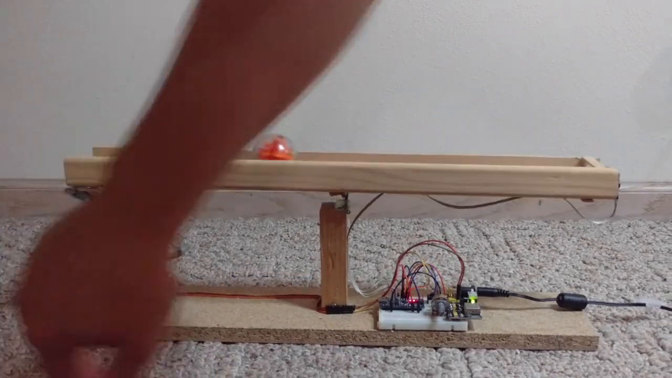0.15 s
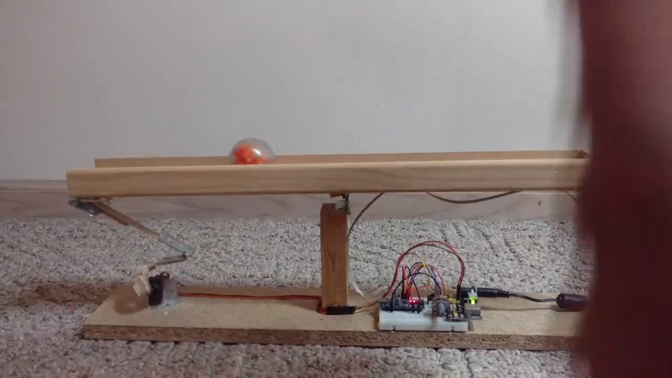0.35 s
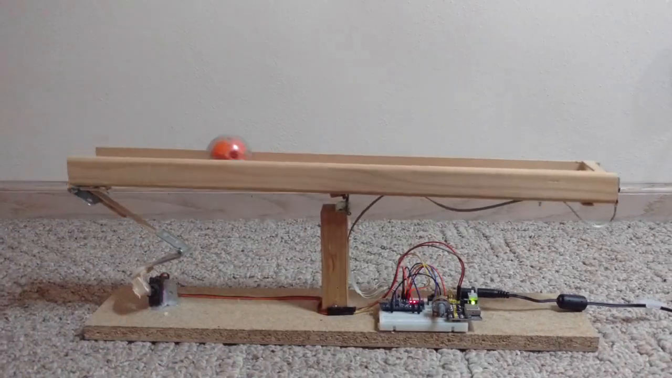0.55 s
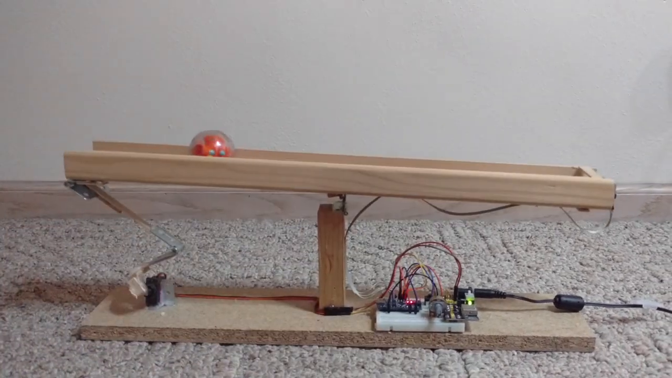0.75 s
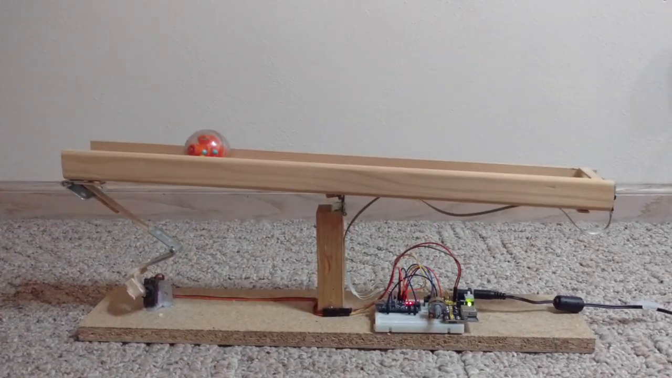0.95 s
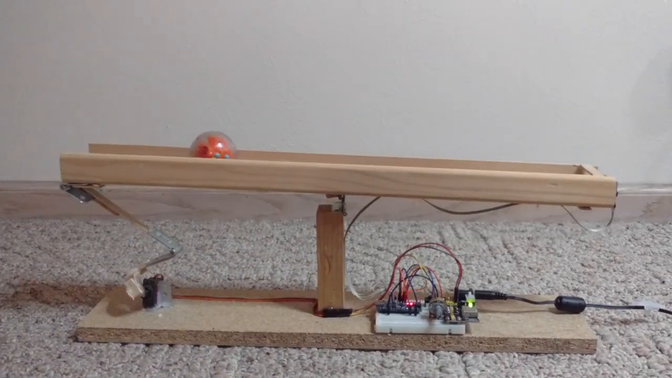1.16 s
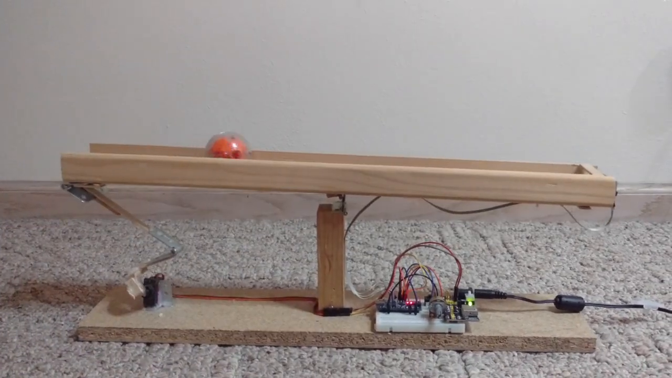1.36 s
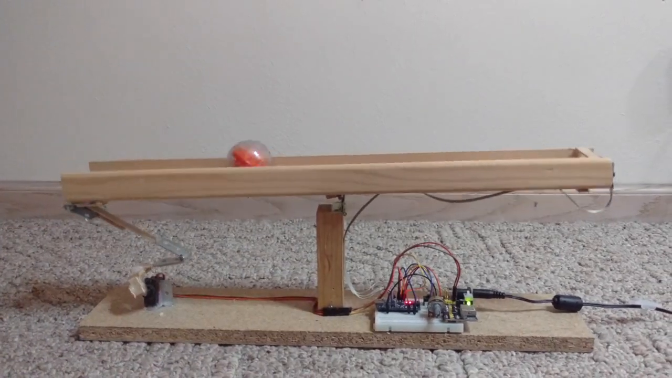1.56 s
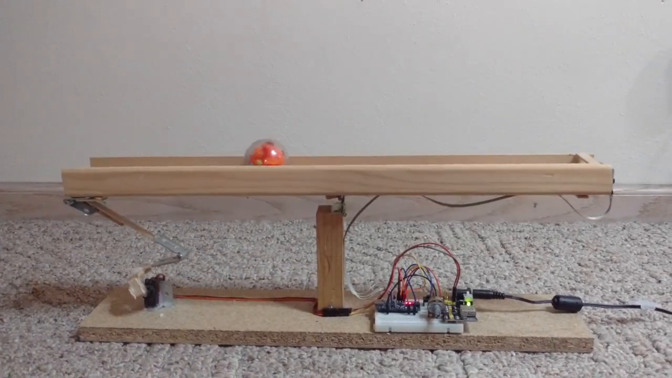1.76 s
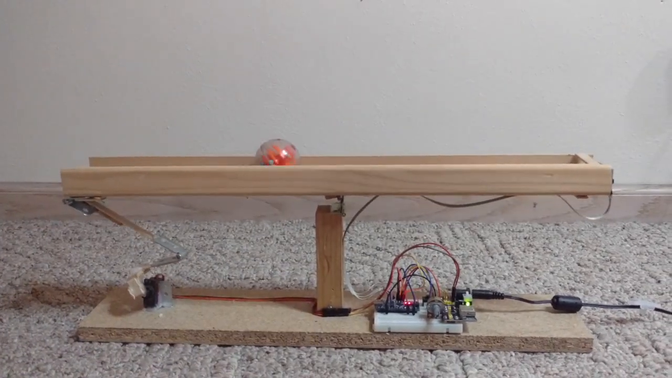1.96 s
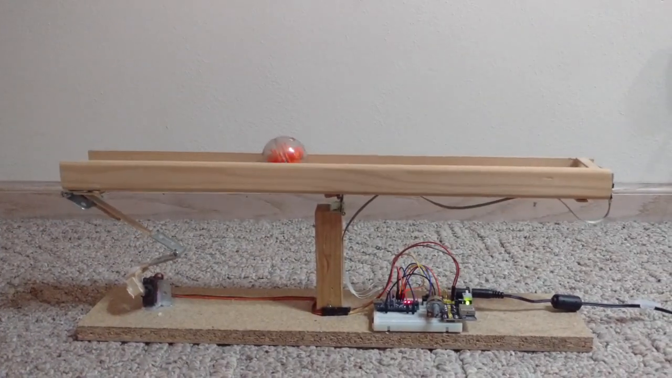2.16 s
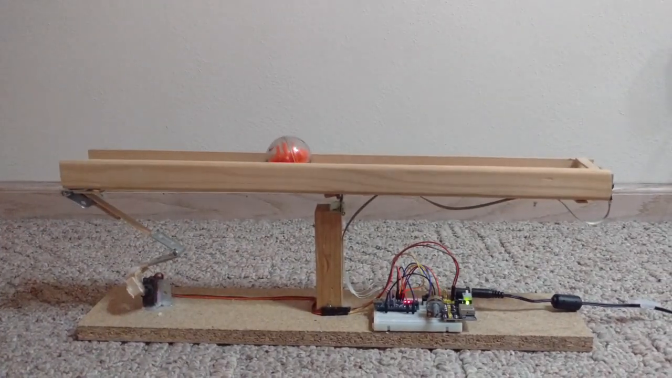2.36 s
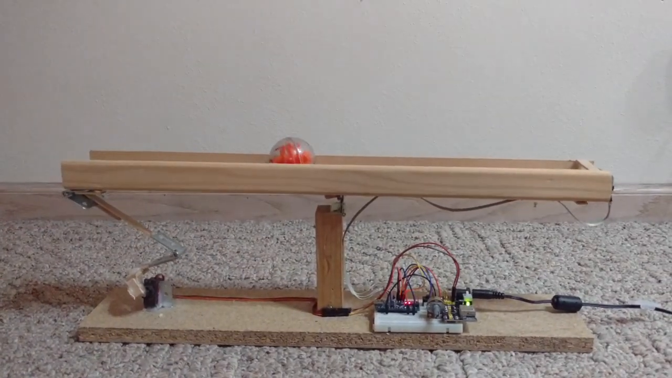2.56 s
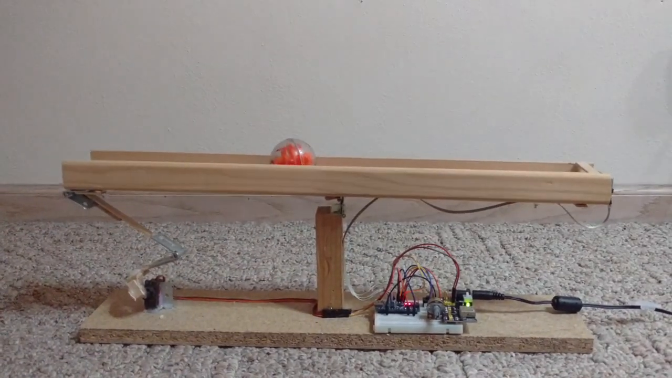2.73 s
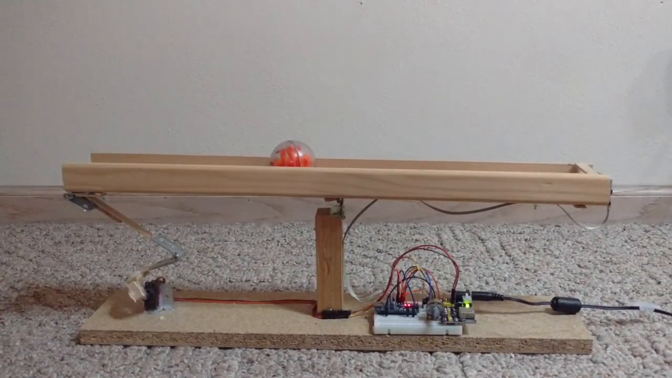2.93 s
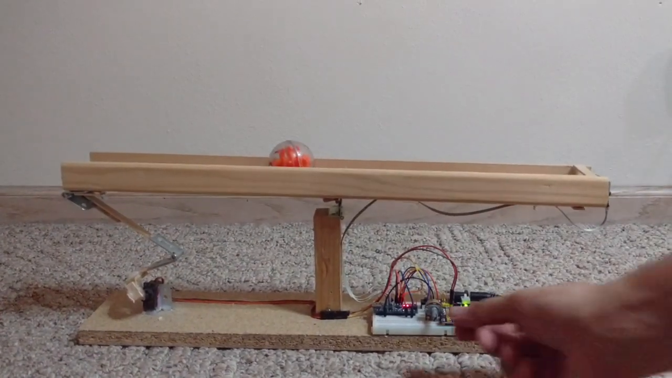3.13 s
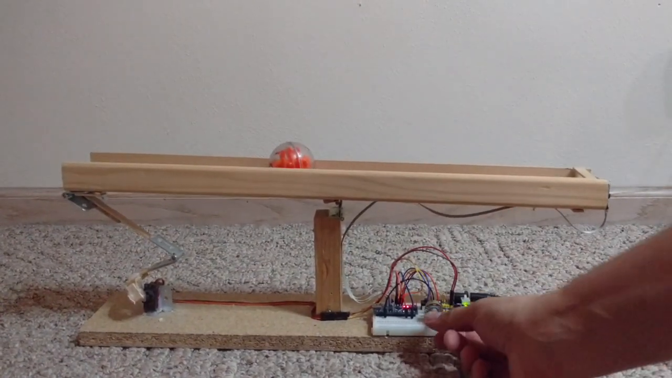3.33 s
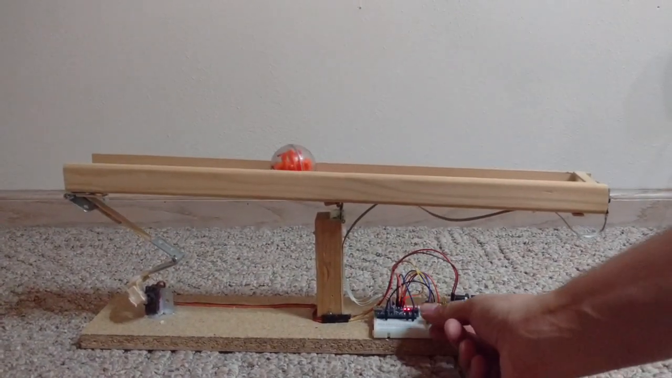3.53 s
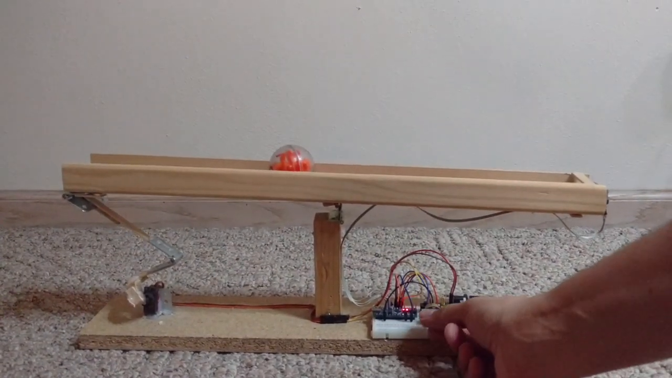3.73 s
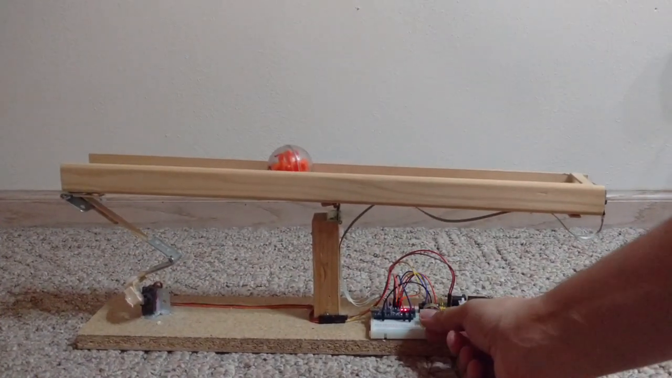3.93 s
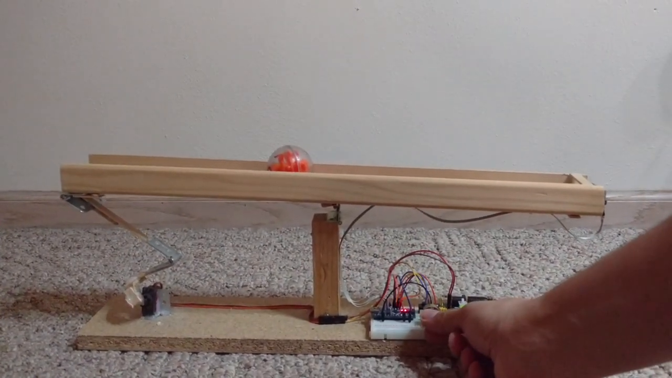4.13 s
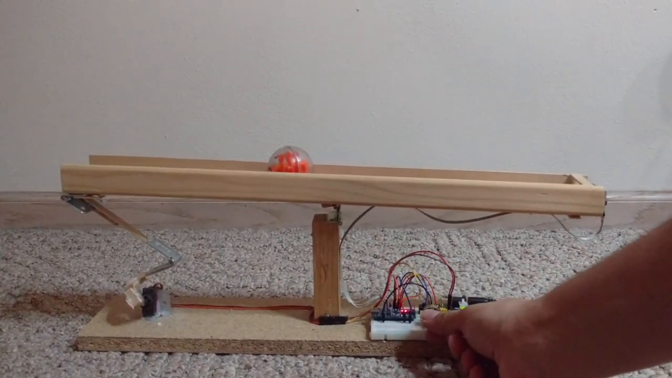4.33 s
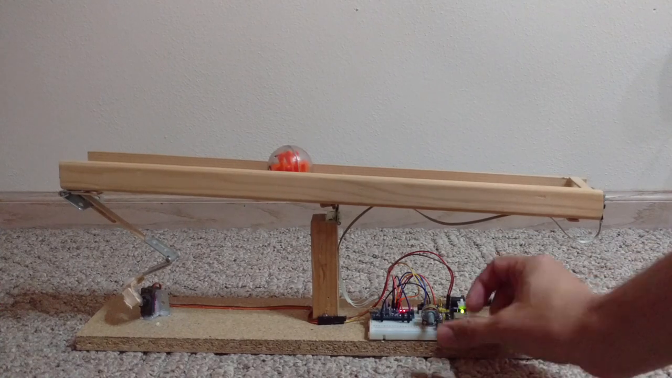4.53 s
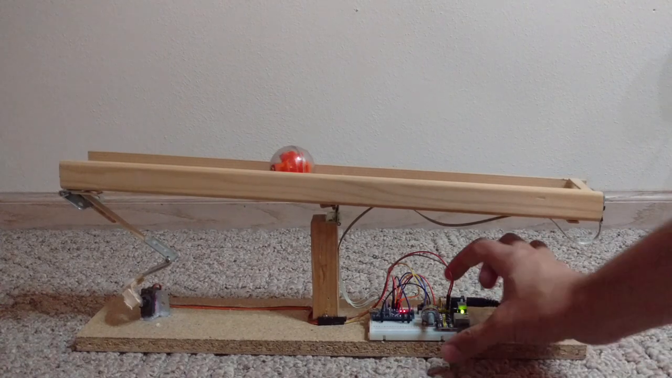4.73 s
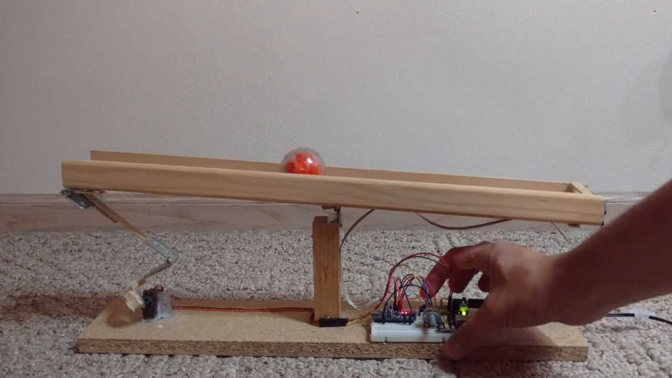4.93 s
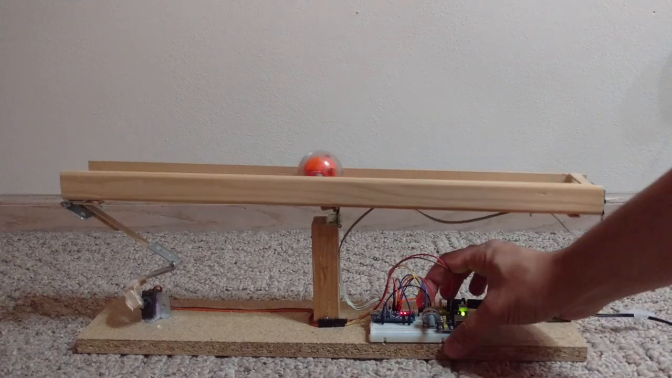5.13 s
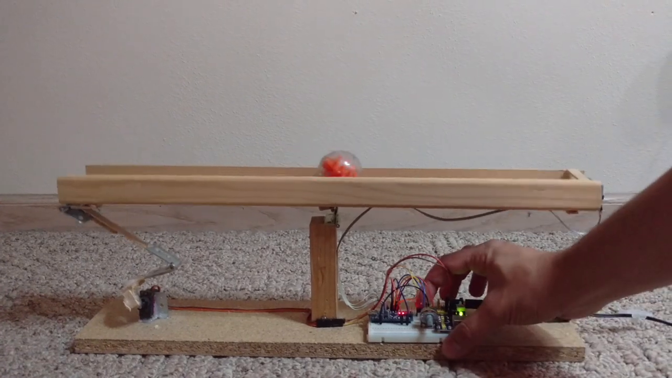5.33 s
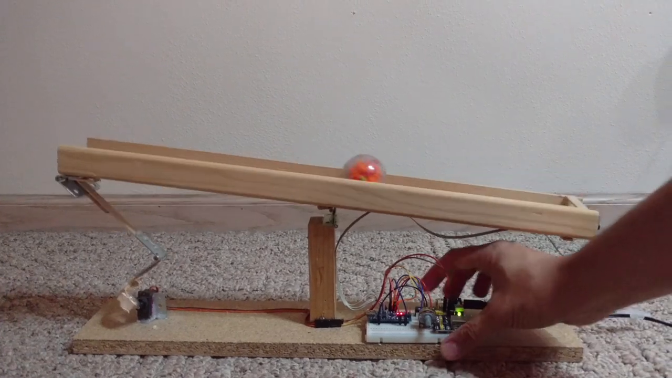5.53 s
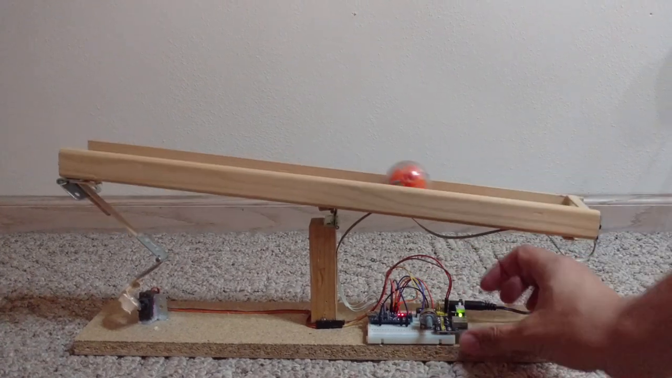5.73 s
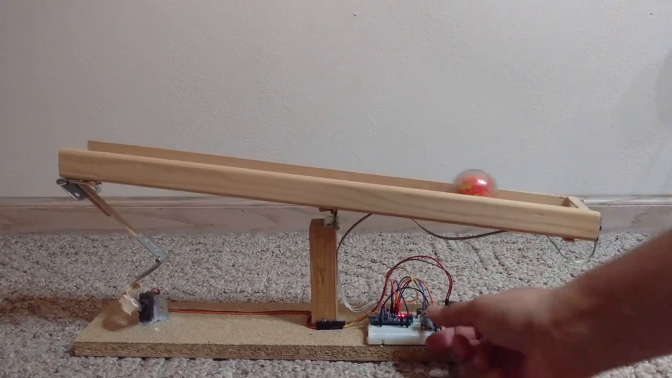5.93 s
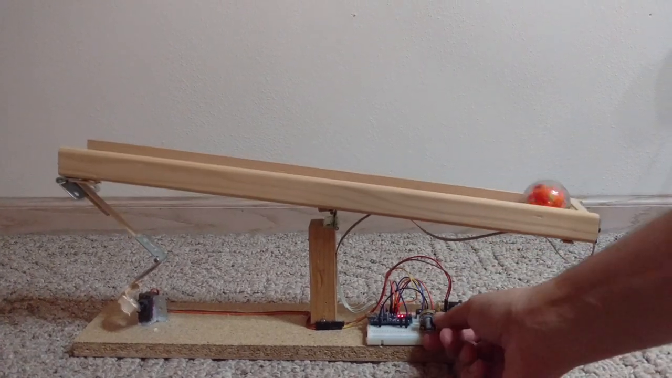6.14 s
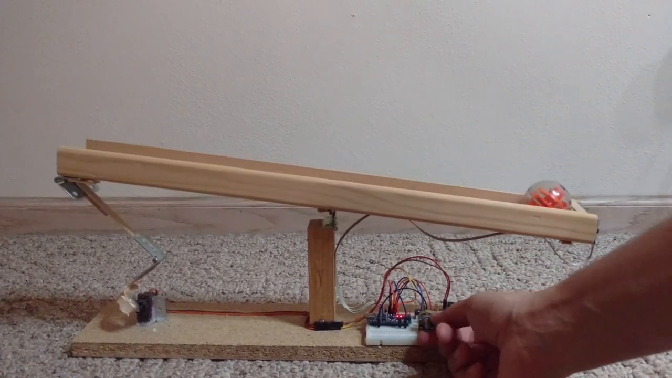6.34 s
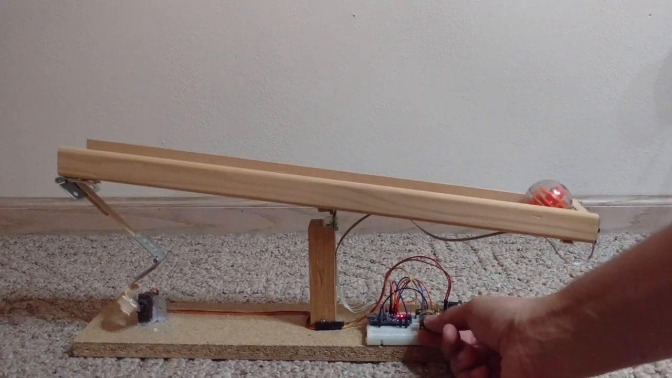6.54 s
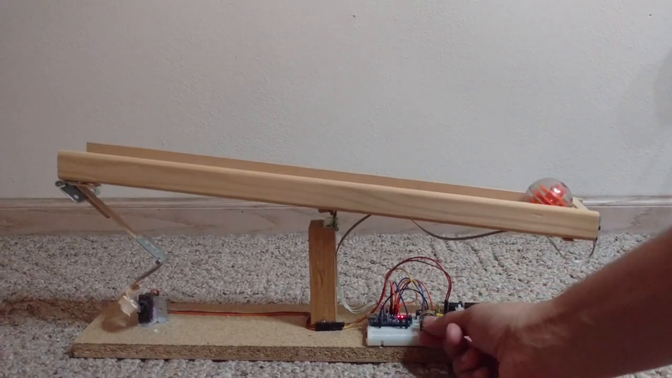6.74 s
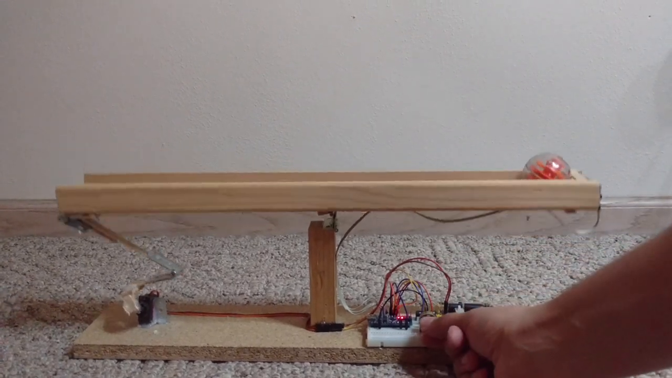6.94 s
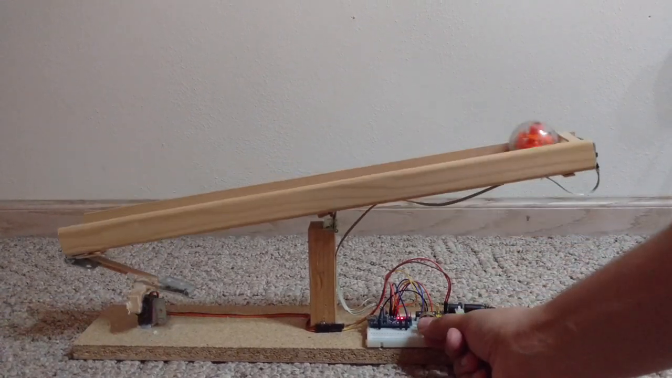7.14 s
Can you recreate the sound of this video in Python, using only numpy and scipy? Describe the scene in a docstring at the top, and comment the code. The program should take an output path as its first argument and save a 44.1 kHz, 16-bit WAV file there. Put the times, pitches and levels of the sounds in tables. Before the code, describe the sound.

A small servo whirs and ticks rapidly as a hollow plastic ball crackles along a tilting wooden beam, finally knocking hard against its end.

```python
"""A hobby servo tilts a wooden beam on which a hollow plastic ball rolls, in a quiet carpeted room.
Throughout, the room hushes and hums and an arm rustles on the carpet: coloured noise and one low tone.
From the start the servo whirs in bursts of gear chatter, ticks fifty times a second until 6 s, and the
ball crackles and rumbles (noise shaped by many tiny contacts). Soon knocks ring the beam, then come soft
bumps, thuds, a far clock, light taps and pings of the wire link. Near 6.2 s the ball hits the end stop."""
import sys
import numpy as np
from scipy import signal
from scipy.fft import rfft, irfft, next_fast_len
from scipy.io import wavfile
from scipy.ndimage import map_coordinates

SR = 44100
rng = np.random.default_rng(int(sys.argv[2]) if len(sys.argv) > 2 else 0)


def digitize_waveform(pressure):
    """Quantize a signal to 16-bit integers and store it at the path in sys.argv[1].

    Rows of a 2-D input are taken as channels; values are limited to [-1, 1].
    """
    field = np.atleast_2d(pressure).T
    bounded = np.clip(field, -1, 1)
    quanta = np.round(bounded * 32767).astype(np.int16)
    wavfile.write(sys.argv[1], SR, quanta)


N = 316638
TIME_S = np.arange(N) / SR
# Levels in the tables are relative: each function trims its layers. t60_s is the time to fade by 60 dB.


def amp(db):
    """Turn decibels into gain."""
    return 10 ** (np.asarray(db) / 20)


def unit(x):
    """Scale to rms 1."""
    return x / np.sqrt(np.mean(x ** 2) + 1e-20)


def along(points, hz):
    """Read a curve of (pitch, value) points on a log pitch axis."""
    point_hz, values = np.transpose(points)
    return np.interp(np.log(hz + 1), np.log(point_hz + 1), values)


def curves(rows):
    """Draw one value per sample for each column after the time."""
    knot_s, *columns = np.transpose(rows)
    return [np.interp(TIME_S, knot_s, column) for column in columns]


def wobble(rate):
    """Draw a smooth random curve with this many knots a second."""
    knots = rng.standard_normal(int(N * rate / SR) + 4)
    return map_coordinates(knots, [np.arange(N) * rate / SR])


def noise(spectrum, size=N):
    """Make coloured noise of rms 1, one row for each of two microphone ports."""
    m = next_fast_len(size)
    colour = amp(along(spectrum, np.fft.rfftfreq(m, 1 / SR)))
    white = rfft(rng.standard_normal((2, m)))
    return unit(irfft(white * colour, m)[:, :size])


def fade(t, t60):
    """Die away exponentially, by 60 dB in t60 seconds."""
    return np.exp(-np.log(1000) * t / t60)


def add(track, s, sound):
    """Mix a sound into a track at time s."""
    start = max(round(s * SR), 0)
    track[:, start:start + sound.shape[1]] += sound[:, :max(N - start, 0)]


def bursts(times, sizes, t60):
    """Loudness curve of rms 1 for many small impacts whose energies add up."""
    places = np.clip(times * SR, 0, N).astype(int)
    energy = np.bincount(places, sizes ** 2, N + 1)[:N]
    decay = fade(np.arange(SR // 10) / SR, t60) ** 2
    return unit(np.sqrt(np.abs(signal.fftconvolve(energy, decay)[:N])))


def contacts(rate, spread_db, t60):
    """Loudness curve of small contacts at uneven gaps and strengths."""
    gaps, strengths = rng.standard_normal((2, 8000))
    times = np.cumsum(np.exp(.5 * gaps)) / rate
    return bursts(times, amp(spread_db * np.clip(strengths, -2, 2)), t60)


def ring(modes, t, scatter_db):
    """Strike modes at new strengths; the two ports hear them a quarter cycle apart."""
    ports = np.array([[1], [-1]]) * np.pi / 4
    total = 0
    for hz, db, t60 in modes:
        strength = amp(db + scatter_db * rng.standard_normal())
        total = total + strength * fade(t, t60) * np.sin(2 * np.pi * hz * t + ports)
    return total


def strikes(events, spectrum, rise, t60):
    """Damped strikes without a clear pitch: noise that rises fast and dies away."""
    sound, t = np.zeros((2, N)), np.arange(SR // 2) / SR
    for s, db in events:
        add(sound, s, amp(db) * (1 - fade(t, rise)) * fade(t, t60) * noise(spectrum, size=len(t)))
    return sound


SPEED_LAW = 1.93  # loudness grows as this power of speed


def swell(peak_s, rise_s, fall_s):
    """Loudness, 0-1, of a swing that gathers speed and slows to a stop like a pendulum."""
    t = TIME_S - peak_s
    phase = np.clip(np.maximum(-t / rise_s, t / fall_s), 0, 1)
    return np.abs(np.cos(np.pi / 2 * phase)) ** SPEED_LAW


# the arm's shifts on the carpet: fastest_s, speeding_up_s, slowing_s, level_db
ARM_SHIFTS = [(.35, 1.1, 1.4, -57), (1.55, 0.46, 0.71, -59.5), (2.4, 0.35, 0.39, -54.5),
              (3.35, 1.1, 0.96, -62.5), (5.25, 1.7, 1.2, -64.5), (6.08, 0.28, 0.44, -60.5)]
# colour of the carpet rustle: pitch_hz, level_db
CARPET_COLOUR = [(30, -33.5), (90, -5.5), (170, -3.5), (300, -1), (500, -2.5), (900, -11.5), (2000, -9.5),
                 (6000, -15.5)]
ARM_REST_DB = -66  # its faint rustle in between, before the trim


def arm_on_carpet():
    """Cloth or skin rubs carpet fibres: uneven noise that grows with the speed of the arm."""
    rubbing = amp(ARM_REST_DB)
    for peak_s, rise_s, fall_s, db in ARM_SHIFTS:
        rubbing = rubbing + amp(db) * swell(peak_s, rise_s, fall_s)
    return rubbing * amp(1.0 + 2.3 * wobble(11)) * noise(CARPET_COLOUR)


# colour of the room's steady hush: pitch_hz, level_db
AIR_COLOUR = [(25, -9), (60, -6), (150, 16.5), (300, -18.5), (700, 18), (1400, 12), (2500, 14),
              (6000, 11.5), (11000, -6.5), (15000, -79)]
HUM_HZ, HUM_DB = 150, -78


def room_hush():
    """The steady room: coloured noise and one pure low hum."""
    hum = amp(HUM_DB) * np.sin(2 * np.pi * HUM_HZ * TIME_S)
    return hum + amp(-66.5) * noise(AIR_COLOUR)


# servo moves: start_s, end_s, level_db, spin_up_s, case_ringing_against_gears_db
SERVO_MOVES = [(0, 0.039, -58, 0.0014, -30), (0.213, 0.242, -54.5, 0.0019, -9),
               (0.46, 0.689, -61.5, .002, -25), (1.506, 1.548, -62, 0.0024, -7),
               (5.027, 5.05, -62.5, .002, -16), (5.158, 5.161, -47.5, 0.0022, -3),
               (5.167, 5.22, -62.5, .006, -15), (5.257, 5.537, -59, 0.29, -7.5),
               (5.417, 5.426, -53, 0.0045, -6), (5.475, 5.48, -58.5, .003, -5.5),
               (5.512, 5.518, -58.5, .003, -12), (6.69, 7.176, -68, 0.14, -4),
               (6.946, 7.022, -61.5, 0.052, -11), (7.055, 7.148, -71.5, 0.003, 4)]
# colour of the running gears: pitch_hz, level_db
GEAR_COLOUR = [(150, -51), (900, -14), (1400, 0.5), (2000, -5.5), (2600, -11.5), (3300, -4.5), (4200, 5),
               (4900, 6), (5900, -8.5), (6500, 8.5), (7300, -3.5), (8600, -9), (10000, -7.5), (15000, -27)]
# the case's resonances under running gears: pitch_hz, level_db
WHIRR_COLOUR = [(3700, -26.5), (4120, -13), (4600, -30), (5100, -23), (5420, -9), (5750, -6), (6230, -4.5),
                (6700, -7), (7700, -33), (8340, -11), (9200, -22)]
TOOTH_HZ, TOOTH_SCATTER_DB, TOOTH_T60_S = 520, 2, .013  # middle tooth rate; it drifts at random
SURGE_DB, SURGE_HZ = 1.8, 110  # size and random knots a second of the surges


def servo_run():
    """The gear train spins up, chatters tooth on tooth in uneven surges, rings the case and stops."""
    gears, case = np.zeros((2, N))
    for start, end, db, spin_up, case_db in SERVO_MOVES:
        spinning = np.clip((TIME_S - start) / spin_up, 0, 1)
        stopping = np.clip((end - TIME_S) / 0.0051 + 1, 0, 1)
        gears += amp(db) * spinning * stopping
        case += amp(db + case_db) * spinning * stopping
    turns = np.cumsum(TOOTH_HZ * amp(1.3 * wobble(25))) / SR
    teeth = np.flatnonzero(np.diff(np.floor(turns))) / SR
    strengths = np.clip(rng.standard_normal(len(teeth)), -2, 1)
    chatter = bursts(teeth, amp(TOOTH_SCATTER_DB * strengths), TOOTH_T60_S)
    surge_db = SURGE_DB * np.clip(wobble(SURGE_HZ), -2, 1)
    return amp(16.5 + surge_db) * chatter * (gears * noise(GEAR_COLOUR) + case * noise(WHIRR_COLOUR))


# load on the holding servo: start_s, scrape_db, squeak_db
HOLD_LOAD = [(0, -53.5, -81), (.9, -53.5, -55.5), (1.25, -55, -52.5), (1.7, -50.5, -53.5), (1.92, -52, -57),
             (2.2, -51.5, -61), (2.42, -50.5, -55), (2.65, -49.5, -53.5), (2.92, -58, -56),
             (3.4, -55, -53.5), (3.82, -58, -58), (3.88, -50.5, -58.5), (4.25, -49, -55),
             (4.65, -52, -56.5), (5.5, -48, -55)]
# the servo twitches, a pulse or two kick harder: time_s, extra_db
HARD_KICKS = [(.95, 15), (1.655, 13.5), (1.795, 9), (2.135, 10.5), (3.076, 12), (3.136, 7), (3.173, 17),
              (3.507, 16.5), (4.814, 8.5), (4.896, 7.5)]
# the servo case under a scraping tooth: pitch_hz, level_db
CASE_COLOUR = [(700, -18.5), (1400, -3), (2000, -6.5), (2800, -7), (3450, -0.5), (3750, -6), (4130, 5),
               (4800, -2), (6200, -11), (8500, -13), (14000, -32.5)]
FRAME_HZ, FIRST_PULSE_S, PULSE_JITTER_S = 50, .0157, .0004  # control pulses
REST_FROM_S = 6  # the holding ticks end once the beam is fully tilted
TWITCH_S, SCRAPE_S, SQUEAK_S = .012, .0031, .0016  # half lengths: twitch, scrape and squeak
TICK_LOAD_DB, SCRAPE_SCATTER_DB, SQUEAK_SCATTER_DB = 1.4, .9, 2  # random spread of strength
SQUEAK_HZ, SQUEAK_FALL_HZ_PER_S = 6200, 420000  # middle pitch, which scatters by kick, and its fall
LOOSE_DB = -11  # rattle in the gears' play, against the kicks


def servo_hold():
    """Each pulse kicks the motor: gear teeth scrape, ring the case and squeak; their play rattles."""
    scrape_db, squeak_db = curves(HOLD_LOAD)
    pulse = np.abs(np.round((TIME_S - FIRST_PULSE_S) * FRAME_HZ)).astype(int)
    kick_s = FIRST_PULSE_S + pulse / FRAME_HZ
    draws = np.clip(rng.standard_normal((pulse.max() + 1, 4)), -2, 2)
    late, strength, grip, pitch = draws[pulse].T
    u = TIME_S - kick_s + PULSE_JITTER_S * late  # seconds from the middle of the kick
    twitch_db = sum(db * np.exp(-((kick_s - s) / TWITCH_S) ** 2) for s, db in HARD_KICKS)
    load_db = TICK_LOAD_DB * wobble(9)  # the load shifts a little
    kick_db = twitch_db + load_db + SCRAPE_SCATTER_DB * strength
    kicks = unit(amp(kick_db) * np.exp(-(u / SCRAPE_S) ** 2))
    rattle = amp(LOOSE_DB) * contacts(rate=300, spread_db=2, t60=.01)
    scrape = amp(scrape_db - 3.0) * np.hypot(kicks, rattle) * noise(CASE_COLOUR)
    phase = 2 * np.pi * (SQUEAK_HZ * (1 + .025 * pitch) * u - SQUEAK_FALL_HZ_PER_S * u ** 2 / 2)
    chirp = np.array([np.cos(phase), np.sin(phase)])
    squeak = unit(amp(SQUEAK_SCATTER_DB * grip) * np.exp(-(u / SQUEAK_S) ** 2) * chirp)
    return (scrape + amp(squeak_db - 7.5) * squeak) * (TIME_S < REST_FROM_S)


# the ball rolls to and fro: fastest_s, speeding_up_s, slowing_s,
# shell_crackle_db, beam_rumble_db, track_rattle_db, shell_ticks_db
BALL_ROLLS = [(.01, 0.096, 0.14, -45, -55, -95, -30.5), (0.441, 0.22, 0.18, -44, -65.5, -63, -34.5),
              (.8, 0.24, 0.27, -57, -63, -64.5, -47), (1.481, 0.21, 0.073, -56, -66, -72, -39),
              (1.86, 0.13, 0.12, -57.5, -91, -70, -44), (2.049, 0.14, .11, -47.5, -63, -62.5, -53),
              (2.329, 0.2, 0.1, -51.5, -57, -67.5, -46), (5.15, 0.2, 0.15, -52, -59.5, -74, -38),
              (5.439, 0.29, 0.099, -61, -53.5, -65, -58), (5.851, 0.4, 0.16, -49, -61, -75, -41),
              (6.12, 0.27, 0.11, -52.5, -47.5, -52.5, -34.5), (6.191, 0.027, 0.39, -55, -75, -66, -49.5)]
TICK_GAP_S, TICK_SCATTER_DB, TICK_SLOW_DB = .021, -2, 5  # typical gap, spread, loss at a standstill


def shell_ticks(count=40):
    """List (s, dB) of light ticks that the shell gives at uneven gaps, weaker when it rolls slowly."""
    ticks = []
    for peak_s, rise_s, fall_s, *_, tick_db in BALL_ROLLS:
        gaps, strengths = rng.standard_normal((2, count))
        times = peak_s - rise_s + np.cumsum(TICK_GAP_S * np.exp(0.33 * gaps))
        slowness = np.interp(times - peak_s, [-rise_s, 0, fall_s], [1, 0, 1])
        levels = tick_db + TICK_SCATTER_DB * np.clip(strengths, -2, 2) - TICK_SLOW_DB * slowness
        ticks += [(s, db) for s, db in zip(times, levels) if 0 < s < peak_s + fall_s]
    return ticks


# the loudest clicks of the ball's shell: time_s, level_db
SHELL_CLICKS = [(.0493, -24), (0.102, -29), (0.1319, -23), (0.18, -25), (0.216, -26.5), (0.2749, -32),
                (0.312, -29), (0.366, -28), (0.552, -26.5), (0.5848, -21.5), (0.6288, -28), (0.6645, -28),
                (0.699, -26), (0.73, -28), (1.036, -33.5), (1.049, -38), (1.065, -31), (1.365, -34),
                (1.379, -31.5), (1.955, -34), (1.9755, -31), (2.2961, -21.5), (2.3157, -29), (2.36, -26),
                (2.4018, -26.5), (2.436, -27), (2.474, -31.5), (5.158, -36), (5.232, -37), (5.397, -25.5),
                (5.6817, -26), (5.704, -32), (6.1621, -12.5)]
# colour of the hollow plastic shell: pitch_hz, level_db
SHELL_COLOUR = [(1000, -38), (2500, -29), (3300, -7), (4600, -15.5), (6800, -4), (7900, -2.5), (8800, 2.5),
                (9400, 3), (10200, -7.5), (11400, 5), (12300, -5.5), (13200, -8.5), (14800, -10.5),
                (15800, -29)]
SHELL_CLICK_DB, SHELL_CLICK_T60_S = -4, 0.021  # trim on the listed levels, and decay


def ball_clicks():
    """Sharp contacts make the thin shell sound: noise with a sudden start and a short decay."""
    t, clicks = np.arange(SR // 20) / SR, np.zeros((1, N))
    for s, db in SHELL_CLICKS + shell_ticks():
        add(clicks, s + 0.0011, amp(db + SHELL_CLICK_DB) * fade(t, SHELL_CLICK_T60_S)[None])
    return clicks * noise(SHELL_COLOUR)


# Modes of the beam and frame ring under the hops here and the knocks below; knocks shift their pitch.
# the beam's dead clack and its fainter lasting modes: pitch_hz, level_db, t60_s
BEAM_MODES = [(1410, 4, 0.027), (1137, -33, 0.11), (1268, -25, 0.11), (1367, -21, 0.056),
              (1450, -14.5, 0.057)]
# the beam's upper modes: pitch_hz, level_db, t60_s
BEAM_UPPER_MODES = [(1644, 1.5, 0.016), (1575, -8.5, 0.047), (1754, -13, 0.037), (1942, -9.5, 0.15)]
# modes of the frame and base board: pitch_hz, level_db, t60_s
FRAME_MODES = [(193, -6, 0.082), (520, 0.5, 0.14), (609, -3, 0.13), (726, -1, 0.094), (976, -6.5, 0.11),
               (1132, -7.5, 0.12)]
HOPS_PER_S = 130


def hops():
    """Uneven little landings of the rolling ball, each ringing the beam and its frame."""
    landed = rng.random(N) < HOPS_PER_S / SR
    landings = landed * rng.choice([-1, 1], N) * amp(2 * rng.standard_normal(N))
    t = np.arange(SR // 8) / SR
    modes = ring(BEAM_MODES + BEAM_UPPER_MODES, t, scatter_db=0.5)
    modes = modes + amp(-14) * ring(FRAME_MODES, t, scatter_db=7.5)
    return unit(signal.fftconvolve(landings[None], modes, axes=1)[:, :N])


# colour of the beam's rumble: pitch_hz, level_db
RUMBLE_COLOUR = [(30, -43), (70, -2.5), (120, -30.5), (150, 0), (172, -2.5), (197, 4), (225, 0), (280, -18),
                 (400, -12), (900, -19)]
# colour of the track's rattle: pitch_hz, level_db
TRACK_COLOUR = [(250, -36), (550, -12.5), (900, -9), (1450, -1.5), (1900, 5), (2600, -1), (4000, -31)]
HOP_DB = 5.5  # level of the hops against the listed track rattle


def ball():
    """Rolling makes the thin shell crackle and tick, the track rattle and the beam rumble."""
    shell, rumble, track = sum(amp(row[3:6])[:, None] * swell(*row[:3]) for row in BALL_ROLLS)
    crackle = contacts(rate=190, spread_db=3.6, t60=.012)
    sound = amp(5.5) * shell * crackle * noise(SHELL_COLOUR)
    sound += amp(2.5 + 2.5 * wobble(22)) * rumble * noise(RUMBLE_COLOUR)
    rattle = contacts(rate=90, spread_db=2, t60=.04)
    sound += track * (amp(4.5) * rattle * noise(TRACK_COLOUR) + amp(HOP_DB) * hops())
    return sound + ball_clicks()


# blows on the beam from linkage and ball, a few followed within milliseconds by a weaker repeat: # time_s,
# level_db, upper_modes_db, crack_db, low_ring_db, contact_s
BEAM_BLOWS = [(0.2179, -20, -8, -8, -33, 0.0066), (0.2237, -33, 3, -25, -22, 0.004),
              (0.309, -28, -4.5, -25, -19, 0.0015), (0.4844, -26.5, 0.5, -14, -18, 0.0048),
              (1.408, -43.5, 10.5, -24, -23, 0.0063), (1.5203, -39, 14, -18, -14, 0.0049),
              (1.602, -33.5, -1, -15, -6, 0.0031), (2.243, -34, -3, -8, -16, 0.0023),
              (5.0428, -37, 0, -13, -8, 0.011), (5.1035, -31.5, -5, -19, -6.5, 0.0053),
              (5.1599, -23.5, 1.5, -8, -20, 0.016), (5.256, -35, -7, -9, -4, 0.003),
              (5.378, -39.5, -3, -14, -10, .005), (5.4294, -24.5, 0, -11.5, -18, 0.0075),
              (5.6209, -11.5, -14, -23, -25.5, 0.033), (5.6335, -22.5, -3, -21, -13, 0.0089),
              (5.9633, -26.5, -0.5, -15, -13, 0.0065), (6.0433, -28, 5, -7, -4.5, 0.0062),
              (6.138, -33, -2, -20, -2.5, 0.0068), (6.1649, -8, -8, -8.5, -18.5, 0.0039),
              (6.1685, -27, 0.5, -2, -14.5, .003), (6.1747, -17.5, -7, -12.5, -12.5, 0.0022),
              (6.203, -33, -2, -18, -9.5, 0.0061), (6.274, -25.5, -4, -18.5, -12, 0.021)]
# colour of the crack: pitch_hz, level_db
CRACK_COLOUR = [(200, -43), (600, 12), (1100, 3.5), (1500, 25), (2400, 25.5), (3000, 11), (4000, 10.5),
                (5000, 2.5), (7000, 9.5), (9000, -8), (15000, -9.5)]
BEAM_DETUNE, FRAME_DETUNE = .0094, .035  # random share; beam modes shift with the ball's place and tilt


def knocks():
    """Each blow cracks and rings the beam, a little differently each time, and the frame rings on."""
    sound, t = np.zeros((2, N)), np.arange(SR // 3) / SR
    for s, db, upper_db, crack_db, low_db, contact_s in BEAM_BLOWS:
        stretch = 1 + BEAM_DETUNE * np.clip(rng.standard_normal(), -1.5, 1.5)
        upper = amp(upper_db) * ring(BEAM_UPPER_MODES, t / stretch, scatter_db=1.5)
        modes = ring(BEAM_MODES, t * stretch, scatter_db=1) + upper
        beam = amp(-4.0) * modes * (1 - fade(t, contact_s))  # a longer contact starts softer
        flex = 1 + FRAME_DETUNE * np.clip(rng.standard_normal(), -1.5, 1.5)
        frame = amp(low_db - 8) * (1 - fade(t, 0.03)) * ring(FRAME_MODES, t * flex, scatter_db=2)
        snap = (1 - fade(t, .0015)) * fade(t, .016)
        crack = amp(crack_db + 10.5) * snap * noise(CRACK_COLOUR, size=len(t))
        add(sound, s, amp(db) * (beam + frame + crack))
    return sound


# soft wooden bumps: time_s, level_db
WOOD_BUMPS = [(.322, -40), (.815, -40), (1.06, -37.5)]
# colour of the bumped wood: pitch_hz, level_db
WOOD_COLOUR = [(60, -19), (170, -2.5), (300, -7), (560, -1.5), (800, 0.5), (1200, -9.5), (1800, -4.5),
               (3000, -16.5)]


def soft_bumps():
    """Soft bumps on the wooden rig: dull noise that rises slowly."""
    return amp(-7.0) * strikes(WOOD_BUMPS, WOOD_COLOUR, rise=0.038, t60=0.45)


# dull thuds of the base board: time_s, level_db
BOARD_THUDS = [(.345, -43), (.87, -47.5), (1.673, -48.5), (2.742, -50), (5.399, -43.5), (6.044, -41.5)]
# modes of the base board: pitch_hz, level_db, t60_s
BOARD_MODES = [(198, 1.5, 0.068), (317, -3, 0.077)]


def board_thuds():
    """The base board thuds: two low modes with a soft start."""
    sound, t = np.zeros((2, N)), np.arange(SR // 3) / SR
    for s, db in BOARD_THUDS:
        add(sound, s, amp(db) * (1 - fade(t, 0.015)) * ring(BOARD_MODES, t, scatter_db=1.5))
    return sound


# ticks of a far clock: time_s, level_db
CLOCK_TICKS = [(.745, -40), (1.755, -37), (2.744, -36.5), (3.748, -48), (4.748, -42), (5.742, -44.5),
               (6.746, -42)]
# colour of the clock's case: pitch_hz, level_db
CLOCK_COLOUR = [(200, -18), (500, -9.5), (750, -11.5), (1020, 2), (1400, -3.5), (1700, -13.5),
                (3000, -26.5)]


def far_clock():
    """The clock's tick each second, a strike with a long tail as if blurred by the room."""
    return amp(-9.0) * strikes(CLOCK_TICKS, CLOCK_COLOUR, rise=0.0055, t60=0.4)


# light hard taps on the rig: time_s, level_db
HARD_TAPS = [(1.089, -48), (1.649, -45), (2.203, -38.5), (5.398, -27.5), (6.1639, -22)]
# colour of the taps: pitch_hz, level_db
TAP_COLOUR = [(800, -5), (2000, -9), (3100, 7), (4200, -25.5), (6000, 2), (11000, 6), (15000, 0)]


def light_taps():
    """Light hard taps on the rig: bright noise that dies in milliseconds."""
    return amp(9.0) * strikes(HARD_TAPS, TAP_COLOUR, rise=0.0017, t60=0.0083)


# pings of the wire link: time_s, level_db
LINK_PINGS = [(2.205, -42), (5.161, -44), (5.254, -38.5), (5.619, -34.5), (6.165, -27)]
# modes of the wire: pitch_hz, level_db, t60_s
WIRE_MODES = [(2760, -3, .05), (3070, -3, 0.05), (3370, 5.5, 0.035)]


def link_pings():
    """The stiff wire link pings: three high modes that die quickly."""
    sound, t = np.zeros((2, N)), np.arange(SR // 3) / SR
    for s, db in LINK_PINGS:
        add(sound, s, amp(db - 5) * (1 - fade(t, 0.0015)) * ring(WIRE_MODES, t, scatter_db=1))
    return sound


# how long the room rings: pitch_hz, t60_s
ROOM_DECAY = [(150, 0.15), (600, 0.34), (2000, 0.18), (8000, 0.3), (15000, 0.058)]


def room(x):
    """The walls' answer: a tail of noise in which each frequency dies at its own speed."""
    hz, t, z = signal.stft(rng.standard_normal((2, SR // 2)), SR, nperseg=256)
    tail = signal.istft(z * fade(t, along(ROOM_DECAY, hz)[:, None]), SR, nperseg=256)[1]
    tail = np.pad(tail, ((0, 0), (SR // 300, 0))) / np.linalg.norm(tail[0])  # starts a little late
    return signal.fftconvolve(x, tail, axes=1)[:, :N]


def scene():
    """The rig close by, the room around it."""
    background = arm_on_carpet() + room_hush()
    servo, rolling = servo_run() + servo_hold(), ball()
    blows = knocks() + board_thuds() + link_pings()
    wet = room(amp(-9) * servo + amp(-7) * rolling + amp(-12) * blows)
    small_sounds = soft_bumps() + far_clock() + light_taps()
    return servo + rolling + blows + wet + small_sounds + background


# depth of the stereo comb: pitch_hz, level_db
COMB_LEAK = [(100, -6), (1200, -22), (2300, -20), (3400, -13), (4600, -12), (8000, -3), (13000, -6)]
# strength of the side signal: pitch_hz, level_db
SIDE_WIDTH = [(30, 2), (60, 0), (140, -13), (300, -10), (800, -10), (1600, -10), (2000, -5), (2400, 0),
              (2850, -4), (3400, 0), (15000, 0)]
# balance: pitch_hz, left_minus_right_db
LEFT_LEAN = [(2450, 0), (2900, -3), (4500, -4), (7000, -3), (9000, -1), (15000, -1.5)]
COMB_HZ, TOP_HZ = 2290, 15800  # comb spacing, band limit


def record(dry):
    """Stereo widening combs the ports' sum and difference in turn; then clipping and the band limit."""
    m = next_fast_len(N + SR // 4)
    hz = np.fft.rfftfreq(m, 1 / SR)
    left, right = rfft(dry, m)
    # long waves reach both ports alike: their difference is the slope of their sum
    alike = .8 / (1 + (hz / 600) ** 4)
    total = left + right
    difference = np.sqrt(1 - alike ** 2) * (left - right) + 1j * alike * total
    angle, leak = np.pi * hz / COMB_HZ, amp(along(COMB_LEAK, hz))
    sum_gain = np.sin(angle) ** 2 + leak
    difference_gain = (np.cos(angle) ** 2 + leak) * amp(along(SIDE_WIDTH, hz))
    scale = np.hypot(sum_gain, difference_gain) * np.sqrt(2)
    mid = sum_gain * total / scale
    side = difference_gain * difference / scale
    lean = amp(along(LEFT_LEAN, hz) / 2)
    wide = np.clip(irfft([(mid + side) * lean, (mid - side) / lean], m), -1, 1)
    return irfft(rfft(wide) / (1 + (hz / TOP_HZ) ** 80), m)[:, :N]


dry = scene()
out = record(dry)
digitize_waveform(out)
```